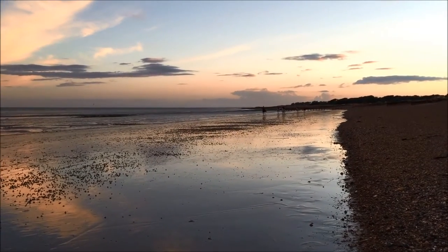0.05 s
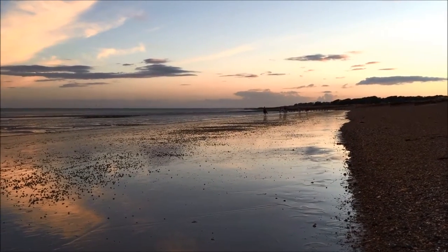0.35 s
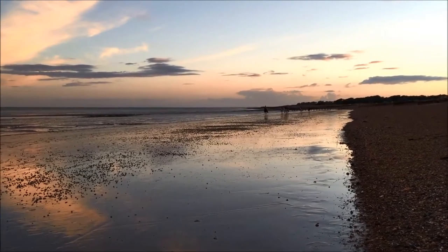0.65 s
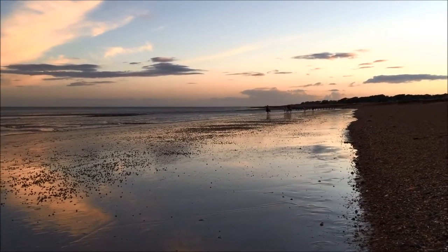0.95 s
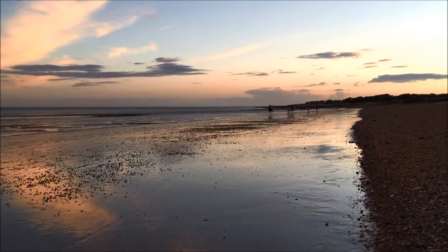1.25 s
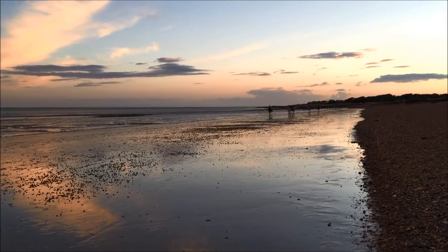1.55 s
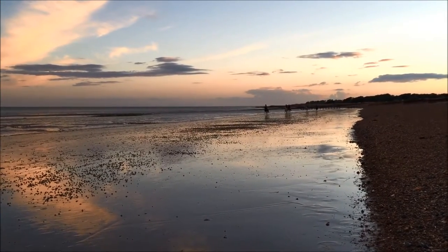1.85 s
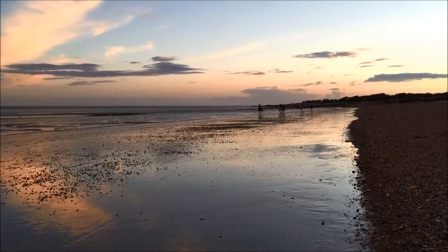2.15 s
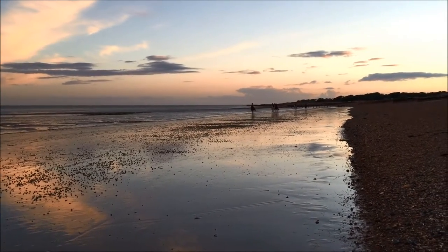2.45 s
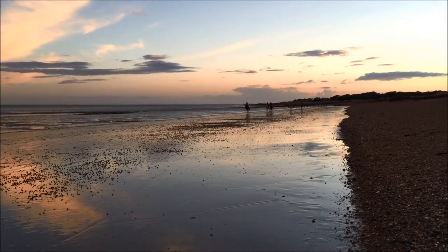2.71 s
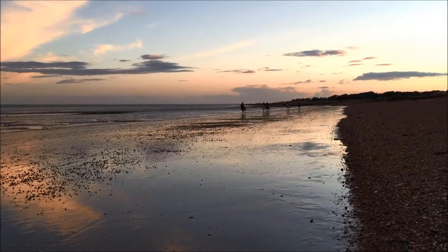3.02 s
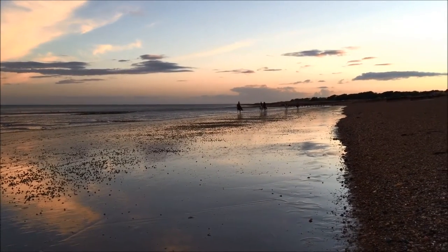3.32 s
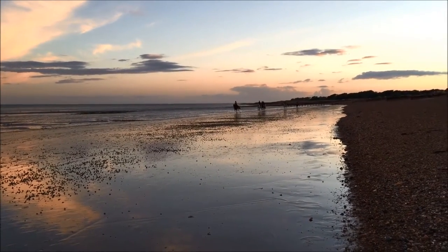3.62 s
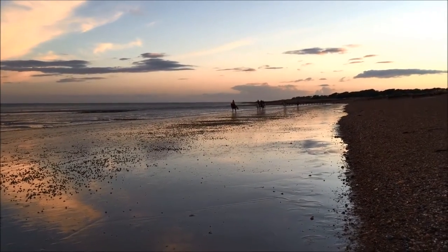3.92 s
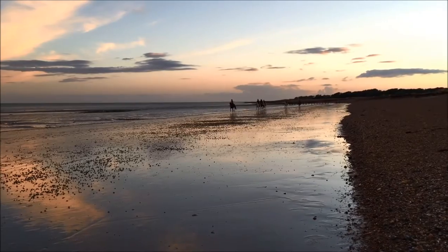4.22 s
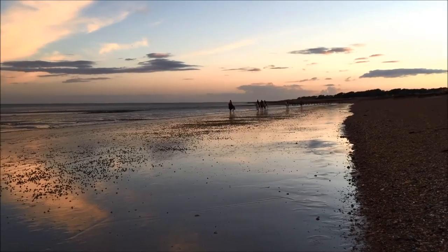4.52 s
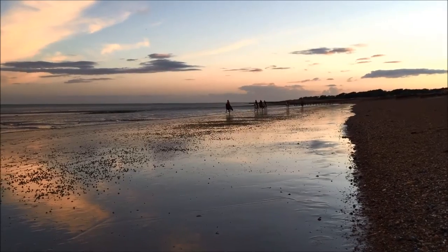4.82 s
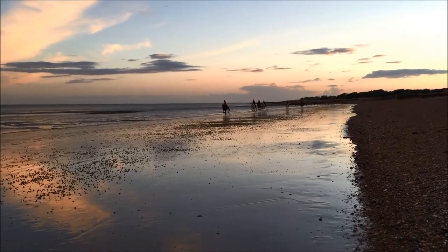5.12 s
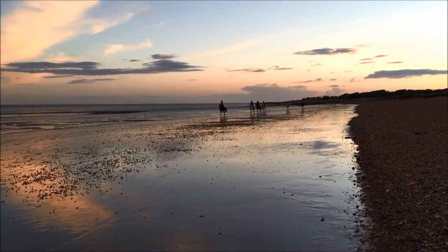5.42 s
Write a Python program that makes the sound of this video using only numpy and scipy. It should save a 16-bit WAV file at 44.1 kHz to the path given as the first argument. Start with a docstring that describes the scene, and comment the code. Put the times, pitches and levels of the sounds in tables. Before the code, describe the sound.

Wet pebbles crunch and clack close to the microphone as hooves walk steadily along an open shore, roughly twice a second. The packed ground answers with hollow thuds, and grit and water sizzle briefly after the harder steps. A low wind rumble runs underneath, bumping the microphone hardest about halfway through and repeatedly afterwards. Distant surf adds a very soft, dull wash.

```python
"""An open beach: steps crunch on wet shingle, an even two a second.
Under each tread a few pebbles slip and knock hard, and the packed bed answers with a short hollow thud.
Smaller stones shift and water spatters back; a few hollow clucks and two soft rubs sit underneath.
Wind rumbles on the microphone, single eddies thump on it, and a calm sea washes far off."""
import sys
import numpy as np
from scipy import signal
from scipy.fft import rfft, irfft, next_fast_len
from scipy.io import wavfile
from scipy.ndimage import uniform_filter1d

SR = 44100
rng = np.random.default_rng(int(sys.argv[2]) if len(sys.argv) > 2 else 0)


def int16_out(signal):
    """Quantize to a 16-bit WAV file."""
    q = np.round(np.clip(np.atleast_2d(signal).T, -1, 1) * 32767)
    wavfile.write(sys.argv[1], SR, q.astype(np.int16))


N = 249606
TIME = np.arange(N) / SR

# pebble knocks: t/s, then level/dB, f/Hz for each of thud, clack, crack and grit (rms over KNOCK_S)
PEBBLE_KNOCKS = [(0.0172, -29.5, 435, -41, 1550, -43.5, 3250, -51, 5900),
                 (0.0325, -33, 480, -43, 1050, -46, 2120, -66, 6540),
                 (0.068, -39, 560, -41.5, 1080, -51.5, 2470, -67.0, 6900),
                 (0.12, -32.5, 483, -40, 1010, -50, 2620, -70, 6510),
                 (0.127, -30.5, 457, -56, 1180, -54, 2720, -75, 6500),
                 (0.1546, -36.5, 560, -42, 885, -48.5, 2470, -60, 6520),
                 (0.216, -38, 455, -61, 1090, -68, 2200, -85, 7220),
                 (0.2325, -33, 510, -29, 1030, -41.5, 2340, -55, 5700),
                 (0.2837, -37, 646, -39, 1060, -44, 2620, -68, 5670),
                 (0.3173, -41, 475, -34.5, 960, -58, 3530, -60, 5680),
                 (0.3434, -29, 473, -35.5, 1410, -48.5, 3470, -52, 5620),
                 (0.3526, -50, 570, -55, 1720, -47.0, 2390, -71, 5620),
                 (0.3747, -28, 507, -35, 1590, -35.5, 3220, -51, 5800),
                 (0.457, -37, 507, -56, 1100, -63, 2100, -75, 6000),
                 (0.4691, -44, 447, -44, 1070, -54, 3150, -64, 7540),
                 (0.4864, -28.5, 476, -35.5, 1510, -30, 3150, -45.5, 5440),
                 (0.4973, -32.5, 403, -35.5, 1010, -51, 3350, -71, 5790),
                 (0.576, -50, 450, -48, 1030, -55, 2810, -69, 6000),
                 (0.5843, -48, 496, -41.5, 900, -51.0, 2750, -87, 5940),
                 (0.5913, -27.5, 460, -47, 1020, -49.0, 2850, -70, 6200),
                 (0.6648, -39, 497, -38.5, 855, -45, 2950, -81, 5620),
                 (0.6818, -38, 427, -62, 1010, -61, 2290, -77, 5840),
                 (0.7145, -34, 510, -39, 1020, -46, 3550, -48, 5900),
                 (0.7957, -35.5, 630, -41, 980, -47.5, 2950, -66, 5660),
                 (0.8021, -36, 460, -39, 980, -52, 2520, -51.5, 6750),
                 (0.8295, -31.5, 460, -36.5, 1050, -44.5, 2140, -65.5, 6660),
                 (0.8377, -27, 495, -36.5, 1020, -37.5, 2350, -60, 9850),
                 (0.951, -28.5, 470, -35.5, 1140, -37, 2820, -57.5, 6250),
                 (0.9754, -35.5, 516, -43, 980, -61, 3140, -79, 7280),
                 (1.0573, -30, 503, -40.5, 1050, -44.5, 2230, -61.5, 6620),
                 (1.091, -41, 474, -45, 860, -62, 2420, -65, 7850),
                 (1.154, -34, 510, -52, 1100, -62, 2100, -74, 6000),
                 (1.1812, -36, 527, -39.5, 910, -62, 2140, -68, 9100),
                 (1.207, -34.5, 453, -33, 1020, -40, 3830, -50, 6140),
                 (1.2938, -33.5, 530, -39, 1090, -48, 2600, -55, 6250),
                 (1.312, -28, 554, -44, 960, -55, 2370, -65, 9140),
                 (1.3256, -36, 424, -45, 1250, -49, 2460, -61, 8520),
                 (1.3434, -40, 456, -42, 915, -54, 2120, -85, 8050),
                 (1.3653, -44, 458, -46, 1270, -58, 2180, -78, 5620),
                 (1.407, -37.5, 490, -51, 1210, -69, 2300, -76, 8880),
                 (1.4229, -26, 490, -41, 1030, -48, 3250, -68, 9560),
                 (1.4376, -30, 444, -43, 1670, -49, 2110, -72, 7650),
                 (1.5264, -30, 510, -45, 1130, -52.5, 2550, -69, 8880),
                 (1.535, -34.5, 441, -41, 1070, -64, 2100, -75, 6000),
                 (1.5806, -41.5, 528, -41.5, 980, -66, 2200, -80, 6850),
                 (1.6793, -34.5, 510, -36.5, 970, -46.5, 2560, -76, 6720),
                 (1.6984, -34.5, 427, -41, 970, -45, 2070, -52.5, 5950),
                 (1.7873, -29.5, 530, -38.0, 1030, -37.5, 2690, -51, 5800),
                 (1.8025, -51, 479, -46, 1020, -60, 2440, -73, 6800),
                 (1.8212, -34.5, 450, -40, 874, -45.5, 4070, -57.5, 7700),
                 (1.8368, -36, 580, -36.5, 1230, -42, 2150, -77, 6820),
                 (1.895, -30, 495, -44, 1070, -49.5, 2400, -66.5, 5700),
                 (1.912, -34.5, 450, -41.5, 1050, -53, 2570, -64, 5620),
                 (1.9332, -36.5, 567, -45, 872, -59, 2350, -72.0, 6510),
                 (1.9736, -42, 530, -46, 855, -60, 2150, -71, 9510),
                 (1.9976, -33.5, 426, -41, 1040, -56, 2480, -65.5, 6540),
                 (2.063, -67, 382, -73, 1340, -73.0, 2350, -64, 9500),
                 (2.0882, -35.5, 510, -55, 1120, -62, 2240, -71, 6270),
                 (2.1032, -41, 560, -41, 1100, -45.5, 3430, -58.5, 5570),
                 (2.1897, -32.5, 560, -36, 1010, -45.5, 2210, -49, 6300),
                 (2.198, -35.5, 430, -38.5, 1000, -44.5, 2800, -69, 6000),
                 (2.2514, -30, 460, -37, 1080, -43, 2800, -58, 5700),
                 (2.2792, -32.5, 575, -37, 1030, -51, 2530, -67, 6180),
                 (2.302, -27.5, 585, -56, 883, -47, 2100, -56, 6270),
                 (2.3095, -41, 596, -42.5, 990, -56, 2510, -70.5, 9640),
                 (2.345, -45, 458, -47, 1160, -56.5, 2110, -64, 7420),
                 (2.3587, -28.5, 450, -37.5, 1050, -42, 2820, -48, 5740),
                 (2.3812, -33, 445, -37, 1100, -51, 2300, -75, 5700),
                 (2.465, -31.5, 430, -43.5, 880, -58, 2440, -74, 5620),
                 (2.6794, -35.5, 545, -35.5, 1020, -46.0, 2420, -53, 7360),
                 (2.69, -39.5, 517, -38, 1110, -61, 3000, -73.0, 8260),
                 (2.7131, -54, 523, -53, 1190, -63, 2420, -68, 6440),
                 (2.7264, -30.5, 483, -37.5, 974, -58, 2450, -50.5, 6750),
                 (2.7644, -38, 520, -43, 1120, -54, 2670, -62, 8420),
                 (2.7888, -30.5, 510, -44, 1140, -46, 2380, -57.5, 9250),
                 (2.812, -31.5, 610, -39, 1440, -49, 2380, -68.0, 6620),
                 (2.8243, -52, 464, -56, 880, -64, 2540, -67, 5910),
                 (2.837, -30.5, 450, -36, 1110, -40.5, 3340, -52.5, 6240),
                 (2.844, -37, 427, -41, 1141, -60, 3208, -59, 6000),
                 (2.8838, -39, 435, -68, 1090, -71, 2440, -81, 5660),
                 (2.906, -32, 444, -45.5, 1060, -55, 2470, -69, 7220),
                 (2.9252, -32, 460, -42.5, 1030, -70, 2980, -72, 5840),
                 (3.1069, -35, 483, -39.5, 1020, -68, 2110, -67, 9500),
                 (3.1755, -36.5, 581, -47, 1010, -51, 2750, -67, 5980),
                 (3.1927, -28.5, 567, -34.5, 1030, -43, 2320, -60, 5500),
                 (3.2612, -30.5, 460, -34, 1030, -44, 2190, -60, 5570),
                 (3.2852, -32.5, 574, -39.5, 1010, -42.5, 2140, -57, 6230),
                 (3.304, -27, 538, -43, 1140, -41.5, 2250, -54, 5760),
                 (3.375, -29.5, 430, -38, 1350, -48, 2280, -73, 6800),
                 (3.3894, -32, 556, -39.5, 1170, -49, 3200, -60.5, 6680),
                 (3.413, -38.5, 510, -46, 990, -56, 2314, -74, 6000),
                 (3.481, -36.5, 484, -49.5, 1130, -65, 3600, -79, 6000),
                 (3.5966, -38, 440, -49.5, 980, -71, 2730, -84, 5810),
                 (3.6528, -39, 503, -42.5, 1470, -47, 3600, -57.5, 6160),
                 (3.6721, -28.5, 480, -37.5, 1020, -47, 2200, -58, 5600),
                 (3.6948, -35.5, 490, -39.5, 1080, -44, 3570, -60, 6680),
                 (3.7413, -25, 530, -27.5, 1090, -33.5, 2310, -46.5, 5650),
                 (3.7662, -39, 543, -59, 1110, -66, 3870, -49.5, 9280),
                 (3.7821, -27, 446, -36, 1010, -33.5, 3750, -44.5, 6700),
                 (3.8204, -36, 501, -42.5, 1070, -67, 2260, -76, 9010),
                 (3.8607, -34, 511, -43.5, 1020, -61, 2210, -67.0, 5620),
                 (3.8825, -34, 530, -41, 1440, -42, 3440, -55, 8350),
                 (3.9282, -37, 517, -61, 877, -58, 2300, -80, 6060),
                 (3.949, -36, 430, -47.5, 1060, -63, 2230, -72, 6490),
                 (4.1163, -36, 470, -42, 1040, -56, 2170, -70, 8450),
                 (4.1488, -28.5, 534, -41.5, 1510, -44.5, 3600, -53, 6000),
                 (4.2083, -33, 470, -45, 1130, -57, 2130, -70.0, 5710),
                 (4.2332, -26.5, 610, -28.5, 980, -35.5, 2520, -48, 7850),
                 (4.253, -25.5, 420, -39, 1090, -38, 2440, -50, 6050),
                 (4.27, -30, 440, -31.5, 1610, -33.5, 3600, -47.5, 5670),
                 (4.3184, -26, 434, -39.5, 1150, -47, 2400, -55, 6750),
                 (4.363, -30, 400, -49, 900, -54, 2100, -72, 6000),
                 (4.3804, -37, 564, -48, 856, -55, 3740, -64, 8680),
                 (4.4099, -32, 465, -52, 1050, -53.5, 2280, -61, 6100),
                 (4.4492, -32, 452, -58, 1440, -52, 2750, -59.5, 6930),
                 (4.6113, -40, 457, -47.5, 1070, -61, 2100, -62, 6600),
                 (4.6226, -28.5, 485, -40, 880, -43, 2100, -54, 7150),
                 (4.6381, -30.5, 460, -27, 1020, -35, 3050, -39.5, 6300),
                 (4.7088, -31.5, 417, -37, 1080, -39.5, 2600, -56, 5760),
                 (4.7281, -27, 453, -34, 1020, -42, 3690, -47.5, 5830),
                 (4.7558, -28.5, 430, -33, 835, -41.5, 3300, -54, 5710),
                 (4.7741, -34.5, 597, -38, 991, -43, 2940, -63.5, 5630),
                 (4.7914, -30, 430, -51, 890, -46, 2240, -66, 7150),
                 (4.828, -38, 614, -44.5, 1030, -50, 2110, -70, 9450),
                 (4.8652, -33, 515, -51, 830, -70, 3190, -85, 5840),
                 (4.914, -38.5, 460, -47, 1050, -54.5, 2350, -80, 6000),
                 (5.0964, -27.5, 487, -39, 1550, -41.5, 2600, -49, 5400),
                 (5.1255, -27, 503, -30.5, 1090, -44.5, 3190, -55, 5840),
                 (5.1771, -32.5, 550, -43, 1630, -52, 2330, -71, 5630),
                 (5.1922, -42, 447, -51, 1680, -65, 2110, -71.5, 5690),
                 (5.2105, -28, 584, -35, 1180, -41, 3170, -48.5, 5600),
                 (5.2218, -39, 467, -39.0, 1010, -40.5, 2110, -61, 5620),
                 (5.2441, -26.5, 397, -34, 1030, -40.5, 4000, -50, 5670),
                 (5.255, -32, 430, -37, 1550, -43, 2260, -61, 6000),
                 (5.2657, -47, 540, -39, 991, -45, 3130, -61, 5770),
                 (5.2926, -32.5, 510, -50, 1120, -52, 3310, -72, 5720),
                 (5.317, -33.5, 450, -48, 1010, -55, 2180, -75, 5850),
                 (5.3345, -30.5, 453, -51, 1060, -65, 2120, -69, 6210),
                 (5.3545, -38, 442, -63, 867, -69, 2850, -68, 5980),
                 (5.405, -38.5, 447, -50, 1110, -62, 2190, -69, 5600),
                 (5.5748, -30.0, 455, -34.5, 825, -48.5, 2360, -53.5, 6470),
                 (5.621, -31, 446, -35, 810, -42.5, 4000, -50, 6000),
                 (5.6307, -36, 670, -39, 1260, -50, 2020, -50.5, 6500)]
KNOCK_S = .008
# tone of the dry crack, wet grit, small stones, spray and the soft rubs' hiss: f/Hz, relative level/dB
CRACK_EQ = [(1400, -34.5), (2000, 8), (3200, 4.5), (4100, 3.5), (5000, -8.5), (7000, -25)]
GRIT_EQ = [(4300, 2.5), (5400, 1.5), (6500, -4), (9000, -3.5), (10700, -13), (15500, -19)]
SMALL_STONE_EQ = [(250, -1.5), (480, 8.5), (780, 0.5), (1100, -2), (1900, -10), (3300, -19.5), (5200, -31),
                  (8500, -37.5), (15000, -36)]
SPRAY_EQ = [(1900, 13), (3400, 12), (5000, -1), (8500, -8.5), (11000, -22.5), (15000, -27)]
HISS_EQ = [(2500, -5.5), (4200, 4), (5200, -8), (8000, -17), (10500, -16), (12000, -10), (15500, -19)]
# short, rounded pulses ringing near 1.4 kHz: t/s, envelope peak/dB, f/Hz
HOLLOW_CLUCKS = [(1.028, -37, 1400), (1.043, -26.5, 1420), (1.11, -36, 1420), (1.118, -42, 1490),
                 (1.127, -28, 1460), (1.152, -33, 1340), (1.164, -28.5, 1330), (1.376, -35, 1400),
                 (4.866, -36, 1510), (5.466, -42, 1270)]
# soft rubs: crest t/s, attack/s, decay/s, rasp level/dB, rasp f/Hz, hiss level/dB
SOFT_RUBS = [(1.15, 0.15, 0.14, -45, 1320, -62.5), (3.425, 0.038, 0.026, -48, 1980, -77)]
# eddies hitting the microphone: t/s, envelope peak/dB, f/Hz
EDDY_HITS = [(0.6022, -24.5, 218), (0.9046, -24.5, 155), (1.231, -17.5, 223), (1.645, -19, 88),
             (2.196, -21, 81.5), (2.259, -28, 202), (2.582, -14.5, 191), (2.597, -15.5, 203),
             (2.608, -3.5, 264), (2.932, -17.5, 105), (3.022, -18.5, 286), (3.2412, -18.5, 132),
             (3.368, -18, 158), (3.3895, -17.5, 202), (3.4468, -11, 194), (3.48, -14.5, 240),
             (3.538, -14, 184), (4.006, -18.5, 126), (4.0212, -13.5, 149), (4.0745, -13, 210),
             (4.3231, -16.5, 235), (4.337, -16, 157), (4.3559, -8, 230), (4.426, -16.5, 175),
             (4.594, -11.5, 215), (4.725, -16, 155), (4.815, -19.5, 170), (4.8813, -10.5, 182),
             (4.952, -19.5, 123), (5.365, -15, 155), (5.409, -19, 173)]
# fader moves of the breeze, before trim: t/s, rumble level/dB, flutter level/dB
BREEZE_FADERS = [(0.0, -35.5, -33.5), (0.22, -40.5, -45.5), (1.34, -34.5, -36), (1.38, -42, -43),
                 (1.68, -36.5, -41.5), (1.72, -41, -42), (2.26, -34, -38), (2.54, -34, -45.5),
                 (2.62, -30, -35.5), (2.7, -42.5, -39), (3.459, -29.5, -33), (3.84, -39, -38),
                 (4.0, -28, -38.5), (4.16, -44, -43), (4.36, -31, -35), (4.9, -32.5, -40.5),
                 (5.2, -44, -38.5), (5.36, -31, -41.5), (5.5, -43.5, -45.5), (5.64, -42, -50)]
# tone of the wind's two layers and the far sea: f/Hz, relative level/dB
RUMBLE_EQ = [(18, -33.5), (30, -27), (48, -6.5), (72, -5), (105, -13), (150, -21), (260, -57.5)]
FLUTTER_EQ = [(70, -15.5), (125, -2.5), (190, -3), (280, -9), (420, -19), (800, -51.5)]
SEA_EQ = [(200, -10), (450, -1), (600, -4), (780, -15.5), (1100, -6), (1800, -16), (3200, -23.5),
          (5000, -28), (9000, -33.5), (15500, -38.5)]


def pebbles(knocks):
    """Each knock stacks the bed's hollow thud, a stony clack, a dry crack and a spit of wet grit."""
    starts, thud_db, thud_hz, clack_db, clack_hz, crack_db, crack_hz, grit_db, grit_hz = zip(*knocks)
    count, lead_s = len(starts), .008
    t = np.arange(2048) / SR - lead_s
    rub_t = t + .0003   # a stone rubs just before it lands
    blow = slips(t, count, rise_s=.0018, fall_s=.0016, settle_db=-16, settle_s=.008, snap=1.2)
    rub = slips(rub_t, count, rise_s=.0017, fall_s=.0019, settle_db=-15, settle_s=.008, snap=.8)
    sand = slips(rub_t, count, rise_s=.0016, fall_s=.0014, settle_db=-19, settle_s=.009, snap=.7)
    # each layer rings, with some raw contact noise blended in
    thud_width_hz = 100 * np.exp(.45 * rng.standard_normal(count))
    thud = resonate(blow, thud_hz, thud_width_hz) + from_db(-38) * blow
    clack = resonate(blow, clack_hz, width_hz=200) + from_db(-15) * blow
    crack = resonate(rub, crack_hz, width_hz=400) + from_db(-11) * rub
    grit = resonate(sand, grit_hz, width_hz=900) + from_db(-10.5) * sand
    layers = [(band(thud, 210, 603), thud_db), (band(clack, 895, 1830), clack_db),
              (colour(crack, CRACK_EQ), crack_db), (colour(grit, GRIT_EQ), grit_db)]
    hits = sum(unit_energy(layer) * from_db(db)[:, None] for layer, db in layers)
    return place(hits * np.sqrt(KNOCK_S * SR), np.array(starts) - lead_s)


def slips(t, count, rise_s, fall_s, settle_db, settle_s, snap):
    """One transient a row: tiny slips build to a snap at t = 0, then nearby stones settle in jerks."""
    noise, roughness, jolts = rng.standard_normal((3, count, len(t)))
    slide = np.exp(.6 * noise[:, :1])   # some stones stop dead, others slide on
    burst = np.exp(np.where(t < 0, t / rise_s, -t / (fall_s * slide)))
    jerks = from_db(4.5 * np.repeat(jolts, 48, axis=1)[:, :len(t)])   # about one a millisecond
    settle = from_db(settle_db) * np.exp(-t / settle_s) * (t > 0) * jerks
    friction = unit_energy((burst + settle) * noise * from_db(4.16 * roughness))
    since_landing = np.arange(len(t)) - np.argmin(np.abs(t))
    rebound = (.0011 * SR * slide).astype(int)   # one softer bounce
    return friction + snap * ((since_landing == 0) - .6 * (since_landing == rebound))


def small_stones(crunch, follow_db, idle_db, grains_per_s, grain_db, settle_s):
    """Small stones tick against each other at scattered pitches: hard around knocks, faint between."""
    load = follow(crunch, window_s=.039, release_s=settle_s)
    sizes = from_db(grain_db * np.minimum(rng.exponential(1, N), 2)) * rng.choice([-1, 1], N)
    grains = sizes * (rng.random(N) < grains_per_s / SR)
    pitches = np.geomspace(420, 9000, 24)
    pitch_index = rng.integers(0, len(pitches), N)
    strikes = [grains * (pitch_index == k) for k in range(len(pitches))]
    rings = resonate(strikes, pitches, width_hz=.16 * pitches).sum(axis=0)
    ticks = rms_one(colour(rings + from_db(-20.5) * grains, SMALL_STONE_EQ))
    return (from_db(follow_db) * load + from_db(idle_db)) * ticks


def spray(crunch, follow_db, grain_db):
    """The grittiest knocks squeeze out water and sand, which spatter back as a short sizzle."""
    airborne = follow(band(crunch, 3300, 16000), window_s=.012, release_s=.045)
    drops = rng.standard_normal(N) * from_db(grain_db * drift(700))
    return from_db(follow_db) * airborne * rms_one(colour(drops, SPRAY_EQ))


def hollow_clucks(rise_s, fall_s):
    """Short pulses of tone, each with a rounded attack, dying within a few cycles."""
    out = np.zeros(N)
    for at_s, db, hz in HOLLOW_CLUCKS:
        near = np.abs(TIME - at_s) < .03
        t = TIME[near] - at_s
        envelope = np.exp(np.where(t < 0, t / rise_s, -t / fall_s))
        out[near] += from_db(db) * envelope * np.sin(2 * np.pi * hz * t)
    return out


def soft_rubs(width_hz, judder_db):
    """A soft, juddering rasp swells and fades under a thin hiss."""
    out = np.zeros(N)
    for crest_s, rise_s, fall_s, rasp_db, hz, hiss_db in SOFT_RUBS:
        swell = np.exp(-np.abs(TIME - crest_s) / np.where(TIME < crest_s, rise_s, fall_s))
        judder = rng.standard_normal(N) * from_db(judder_db * drift(250))
        rasp = band(judder, hz - width_hz / 2, hz + width_hz / 2)
        hiss = colour(rng.standard_normal(N), HISS_EQ)
        out += swell * (from_db(rasp_db) * rms_one(rasp) + from_db(hiss_db) * rms_one(hiss))
    return out


def eddies(attack_cycles, glide, steepen):
    """An eddy thumps: a quick dip in pressure whose swings slow down as it leaves the microphone."""
    out = np.zeros(N)
    for at_s, db, hz in EDDY_HITS:
        near = np.abs(TIME - at_s) < .03
        cycles = (TIME[near] - at_s) * hz
        phase = 2 * np.pi * (1 - np.exp(-glide * np.maximum(cycles, -2))) / glide + .63
        width = np.where(cycles < 0, attack_cycles, 2.74 * attack_cycles)
        envelope = from_db(db) * np.exp(-(cycles / width) ** 2)
        # the stronger the eddy, the steeper its flanks
        out[near] -= envelope * np.sin(phase + steepen * envelope * np.sin(phase))
    return out


def wind(rumble_trim_db, flutter_trim_db):
    """The breeze buffets the microphone: a deep rumble with a higher flutter on its own fader."""
    times, rumble_db, flutter_db = np.transpose(BREEZE_FADERS)
    rumble_gain = from_db(np.interp(TIME, times, rumble_db) + rumble_trim_db)
    flutter_gain = from_db(np.interp(TIME, times, flutter_db) + flutter_trim_db)
    rumble = turbulence(RUMBLE_EQ, steady_s=.039, lumpy_db=2.5)
    flutter = turbulence(FLUTTER_EQ, steady_s=.025, lumpy_db=5.5)
    return rumble_gain * rumble + flutter_gain * flutter


def turbulence(eq, steady_s, lumpy_db):
    """Churning air: coloured noise, levelled and then broken into small lumps; rms 1."""
    air = colour(rng.standard_normal(N), eq)
    window = int(steady_s * SR)
    power = uniform_filter1d(uniform_filter1d(air ** 2, window), window)
    return rms_one(air / np.sqrt(power + 1e-20) * from_db(lumpy_db * drift(45)))


def sea(level_db):
    """Small waves far out lay down a soft, dull wash."""
    return from_db(level_db + drift(3.734)) * rms_one(colour(rng.standard_normal(N), SEA_EQ))


def from_db(db):
    """Decibels to gain."""
    return 10 ** (np.asarray(db) / 20)


def rms_one(x):
    """Scale to an rms of 1."""
    return x / np.sqrt(np.mean(x ** 2) + 1e-20)


def unit_energy(rows):
    """Scale each row to an energy of 1."""
    return rows / np.linalg.norm(rows, axis=1, keepdims=True)


def follow(x, window_s, release_s):
    """Envelope follower with an exponential tail."""
    pole = np.exp(-1 / (release_s * SR))
    return signal.lfilter([1 - pole], [1, -pole], uniform_filter1d(np.abs(x), int(window_s * SR)))


def colour(x, eq):
    """Minimum-phase EQ through (f/Hz, level/dB) points, rolling off 20 dB an octave past its ends."""
    size = next_fast_len(2 * x.shape[-1], real=True)
    size += size % 2
    octave = np.log2(np.maximum(np.fft.rfftfreq(size, 1 / SR), 1))
    hz, db = np.transpose(eq)
    beyond = np.abs(octave - np.clip(octave, np.log2(hz[0]), np.log2(hz[-1])))
    curve_db = np.interp(octave, np.log2(hz), db) - 20 * beyond
    cepstrum = irfft(np.log(from_db(curve_db)))
    # folded forward in time, so nothing rings ahead of a hit
    cepstrum[1:size // 2] *= 2
    cepstrum[size // 2 + 1:] = 0
    return irfft(rfft(x, size) * np.exp(rfft(cepstrum)))[..., :x.shape[-1]]


def drift(rate_hz):
    """Random modulator gliding between values with a spread of 1."""
    steps = rng.standard_normal(N // 100)
    return np.interp(TIME * rate_hz, np.arange(len(steps)), steps)


def resonate(pushes, hz, width_hz):
    """One resonator a row, peak gain 1: the narrower, the longer it rings."""
    radii = np.exp(-np.pi * width_hz / SR) * np.ones(len(hz))
    rings = []
    for push, pitch, r in zip(pushes, hz, radii):
        gain = (1 - r * r) / 2
        feedback = [1, -2 * r * np.cos(2 * np.pi * pitch / SR), r * r]
        rings.append(signal.lfilter([gain, 0, -gain], feedback, push + 1e-18))
    return np.array(rings)


def band(x, low_hz, high_hz):
    """Band-pass along time."""
    return signal.sosfilt(signal.butter(2, [low_hz, high_hz], "band", fs=SR, output="sos"), x)


def place(hits, starts):
    """Lay short hits on the timeline."""
    out = np.zeros(N + hits.shape[1])
    for hit, start_s in zip(hits, starts):
        i = int(np.clip(start_s * SR, 0, N))
        out[i:i + len(hit)] += hit
    return out[:N]


def scene():
    """A dry, open-air mono mix: the crunch up close, wind and sea around it, no echo."""
    air = wind(rumble_trim_db=2.5, flutter_trim_db=-.1) + sea(level_db=-59.5)
    thumps = eddies(attack_cycles=.52, glide=.53, steepen=.6)
    crunch = pebbles(PEBBLE_KNOCKS)
    loose = small_stones(crunch, follow_db=-9, idle_db=-59, grains_per_s=2200,
                         grain_db=8.5, settle_s=.015)
    accents = hollow_clucks(rise_s=.0012, fall_s=.0015) + soft_rubs(width_hz=660, judder_db=3)
    spatter = spray(crunch, follow_db=-3.5, grain_db=7.5)
    return (crunch + loose + accents + spatter + thumps + air)[None]


def record(dry):
    """The microphone drops the deepest bass, and the top is cut steeply."""
    thin = signal.sosfilt(signal.butter(2, 24, "high", fs=SR, output="sos"), dry)
    return signal.sosfilt(signal.ellip(10, .2, 70, 15850, fs=SR, output="sos"), thin)


dry = scene()
out = record(dry)
int16_out(out)
```